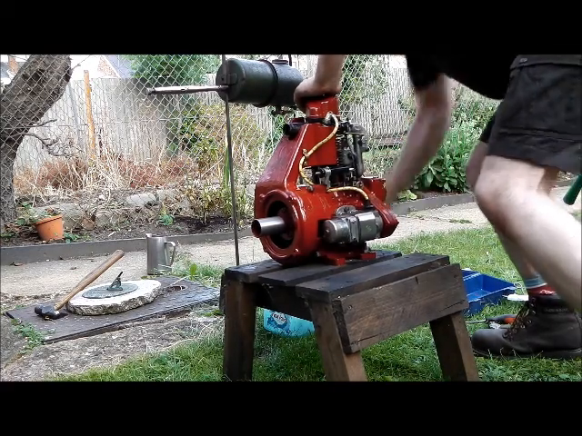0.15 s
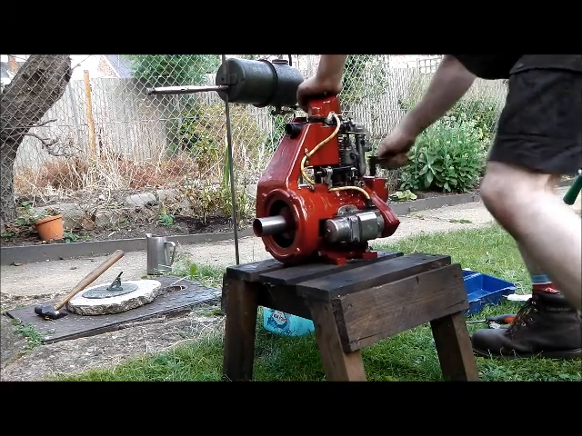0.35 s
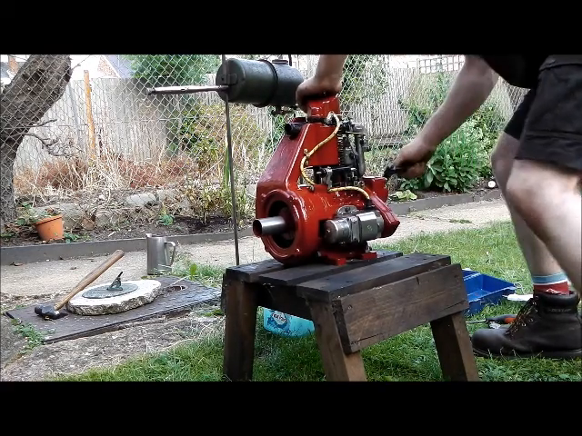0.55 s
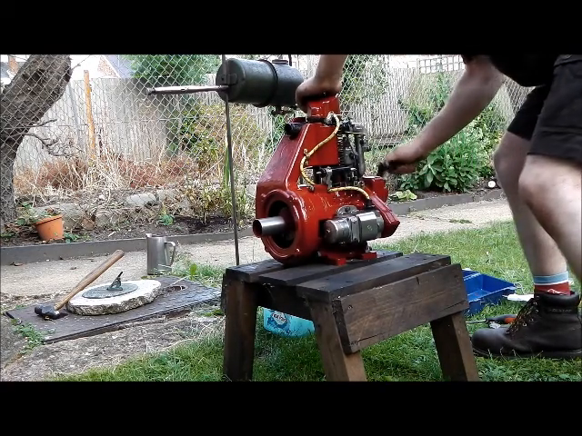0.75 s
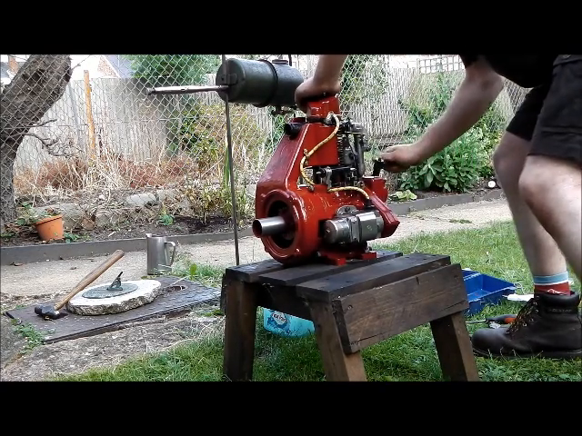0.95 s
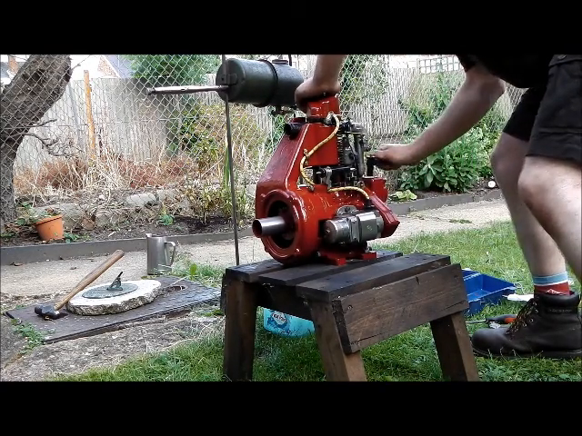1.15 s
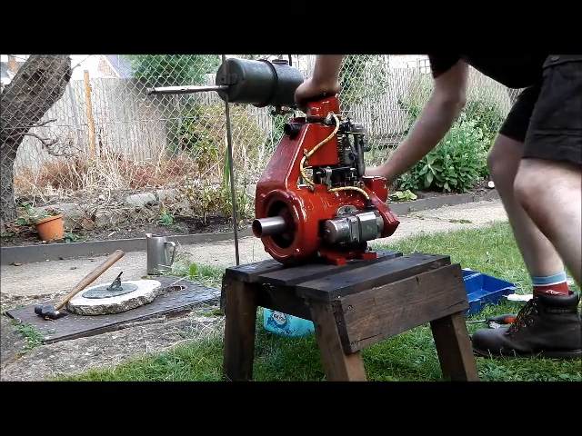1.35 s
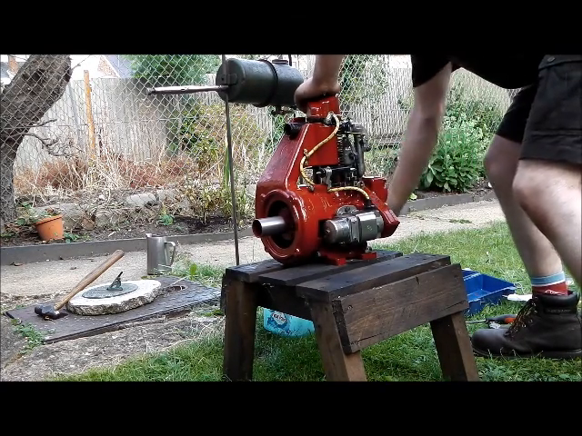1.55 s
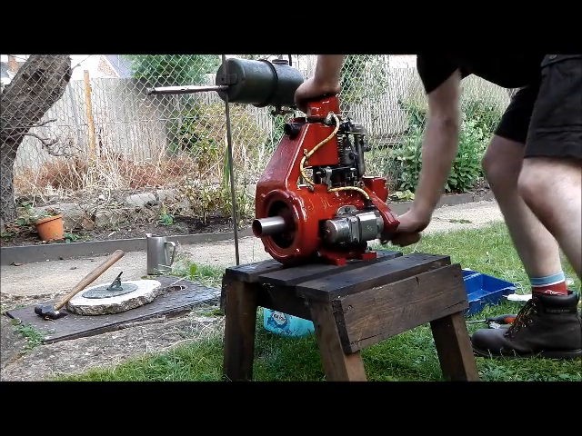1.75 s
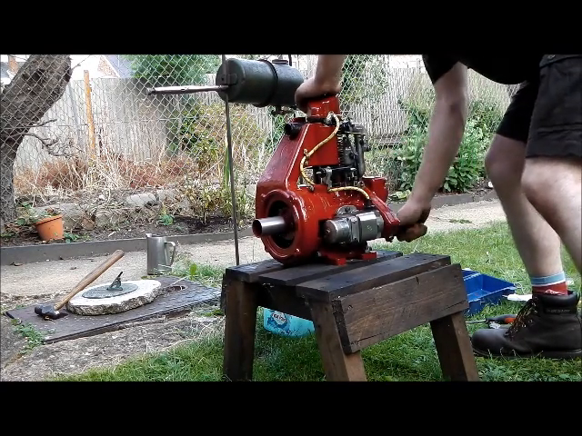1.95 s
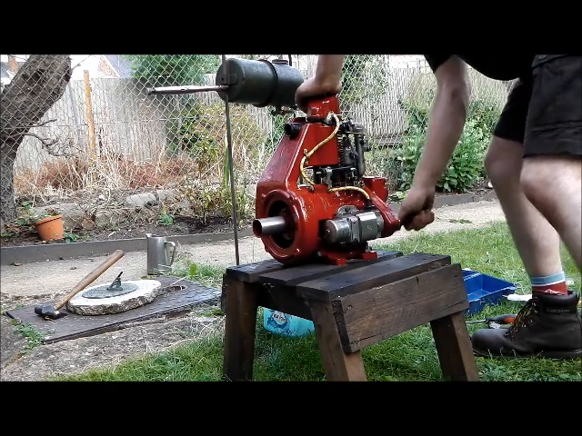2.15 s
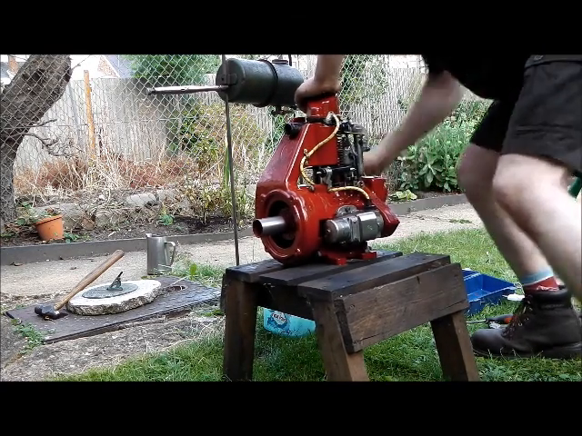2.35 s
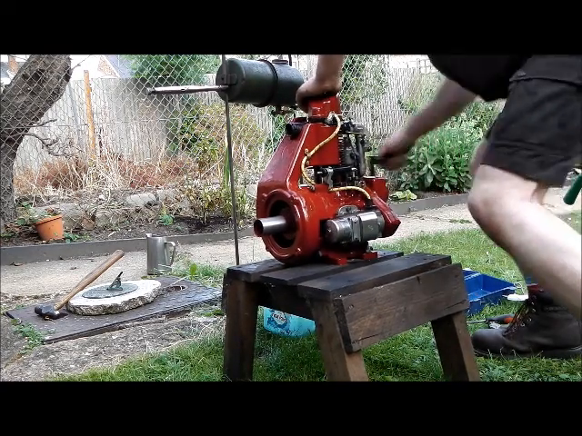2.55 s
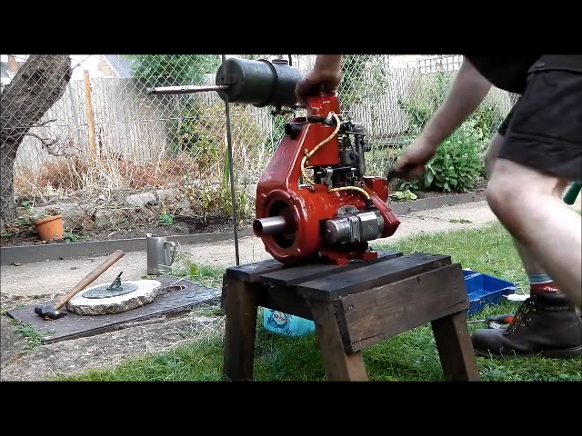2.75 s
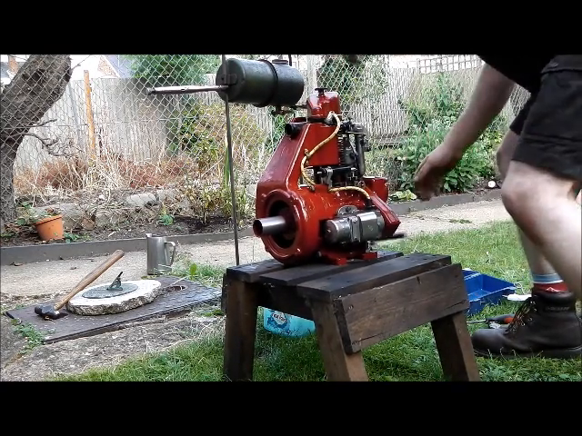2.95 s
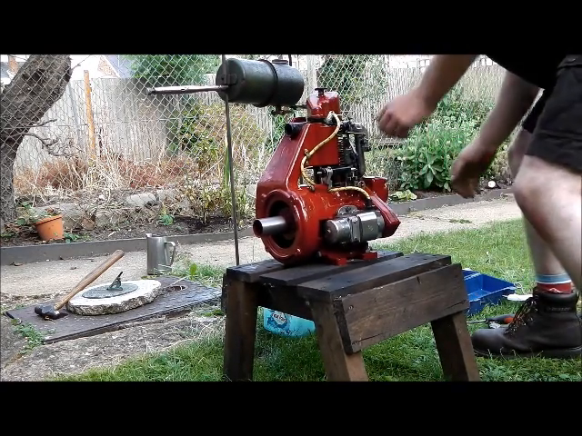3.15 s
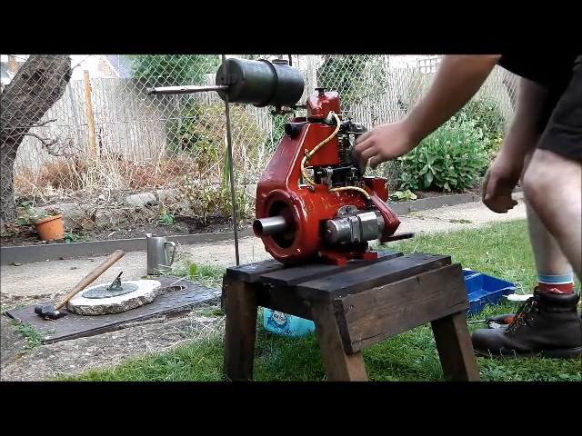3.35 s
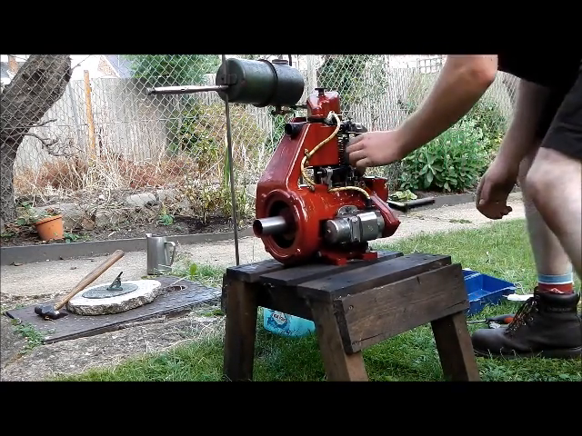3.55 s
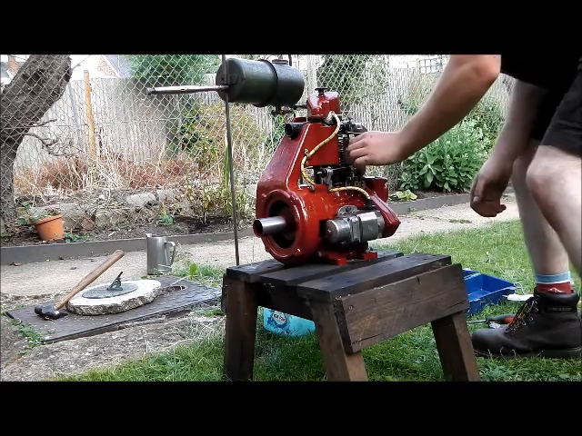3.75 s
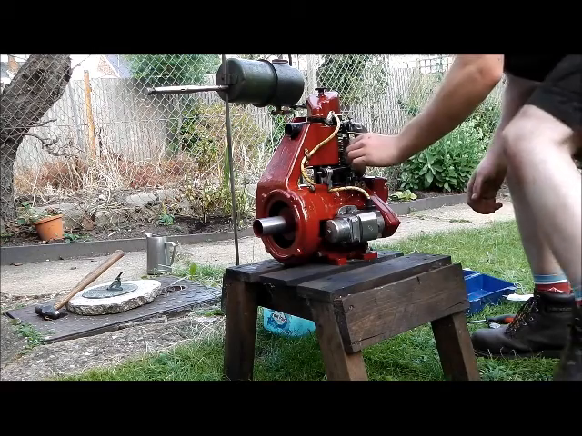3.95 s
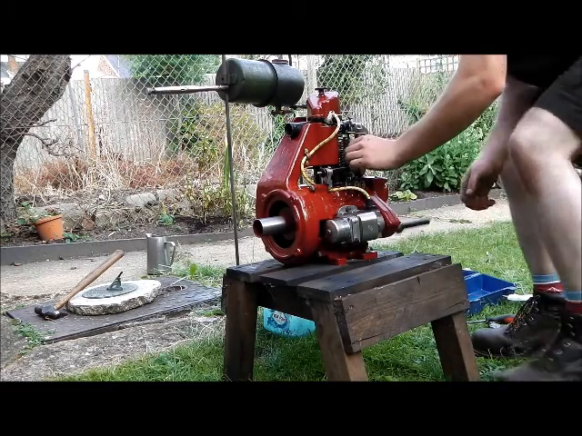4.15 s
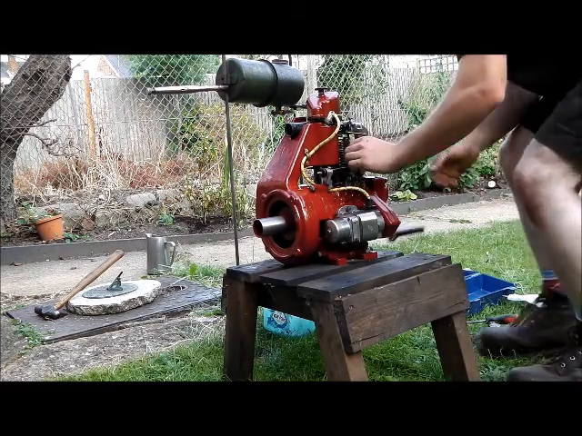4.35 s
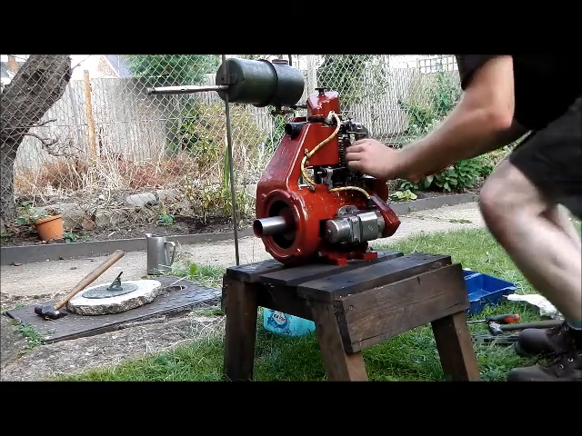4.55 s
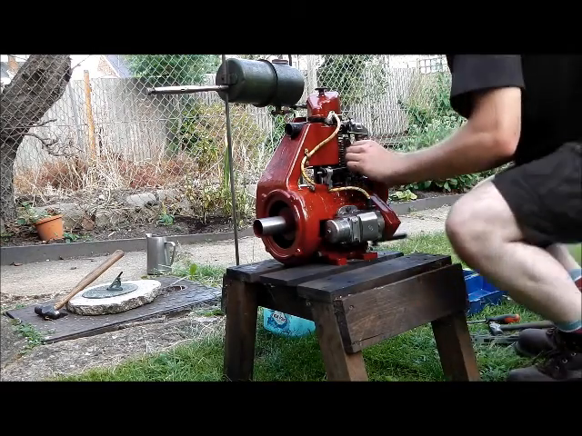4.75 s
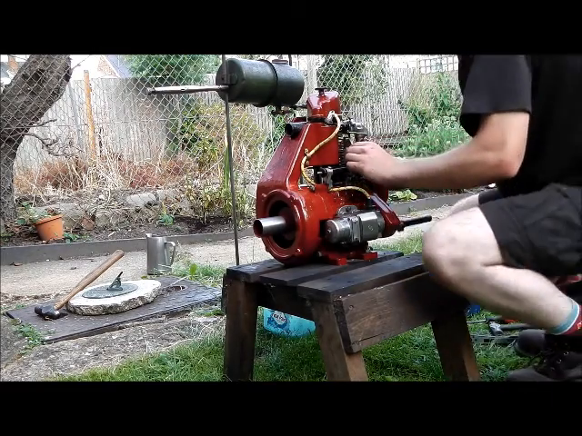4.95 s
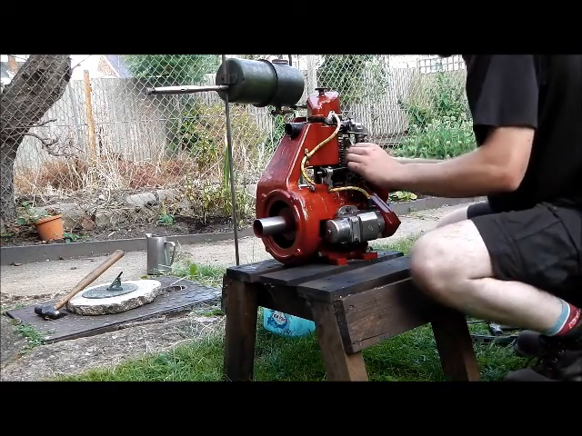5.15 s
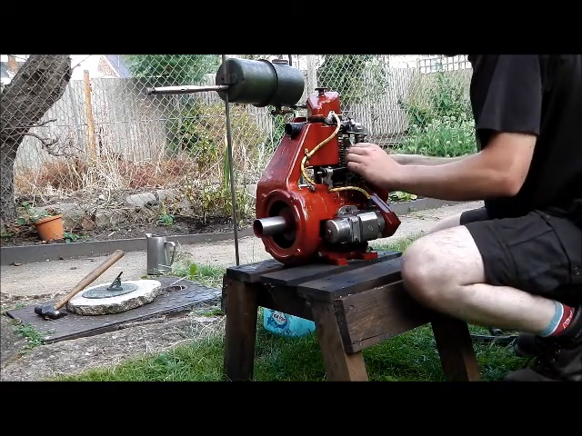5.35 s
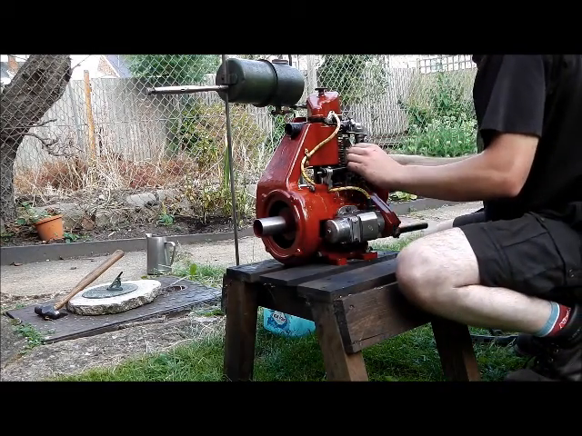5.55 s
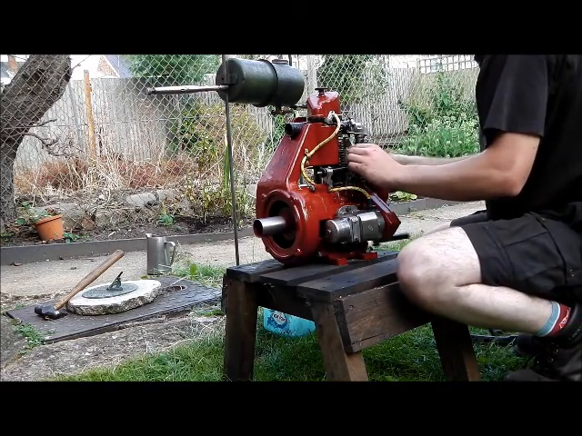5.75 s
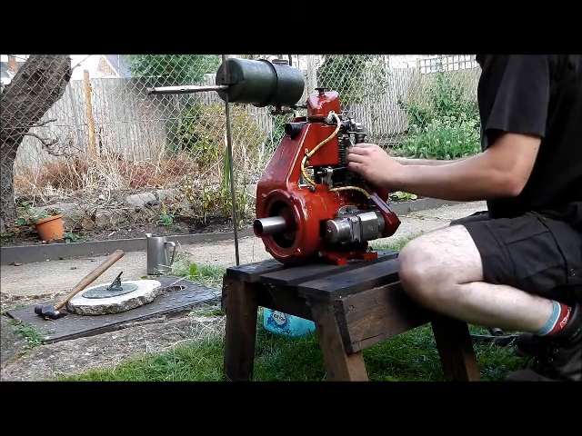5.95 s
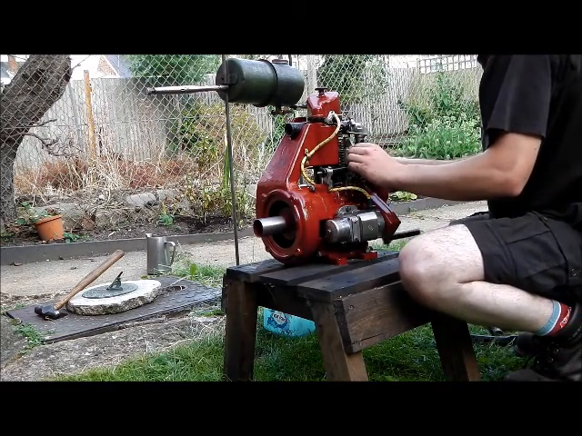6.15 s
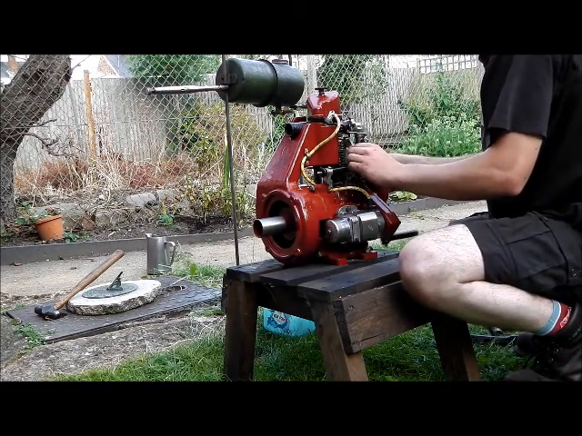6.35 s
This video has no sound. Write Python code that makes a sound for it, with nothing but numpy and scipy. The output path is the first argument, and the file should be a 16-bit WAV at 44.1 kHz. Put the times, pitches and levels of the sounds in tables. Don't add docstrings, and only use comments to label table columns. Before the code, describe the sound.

A hand-started single-cylinder engine close by in a garden. A first pull gives hard metal knocks, gear rattle, cord squeaks and a dull thump; then quiet with faint wheezes. A second pull catches: fast, loud, raspy exhaust blasts, clipped at the peaks, which slow, misfire, nearly die, then settle into steady pops over rattling gears. Fence and wall throw back short echoes.

```python
import sys
import numpy as np
from scipy import signal
from scipy.fft import rfft, irfft, next_fast_len
from scipy.io import wavfile
from scipy.ndimage import uniform_filter1d, map_coordinates

SR = 44100
rng = np.random.default_rng(int(sys.argv[2]) if len(sys.argv) > 2 else 0)


def gain_from_db(level_db):
    decades = np.asarray(level_db, float) / 20
    return 10 ** decades


def master_out(mix):
    frames = np.transpose(np.atleast_2d(mix))
    ceiling = np.clip(frames, -1, 1)
    pcm = np.round(ceiling * 32767).astype(np.int16)
    wavfile.write(sys.argv[1], SR, pcm)


N = 281799
TIME = np.arange(N) / SR

# (time [s], gear level [dB])
RUN = [
    (2.5, -22.5),
    (2.56, -22),
    (2.66, -17),
    (2.82, -15),
    (3.6, -19),
    (4.1, -24.5),
    (4.65, -24.5),
    (5.36, -36.5),
    (5.5, -28.5),
    (6.39, -31.5),
]


def pipe():
    # (time [s], thump level [dB])
    by_hand = [
        (0.12, -18.5),
        (2.36, -21),
    ]
    # (centre [s], frequency [Hz], level [dB])
    stand_knocks = [
        (.044, 120, -43),
        (.076, 125, -39),
        (0.146, 232, -29),
        (.18, 215, -34),
        (0.209, 110, -33),
        (.25, 260, -34),
        (.162, 500, -27),
        (0.294, 515, -35),
    ]
    hand_gas_db = -44
    out, t = np.zeros(N), np.arange(SR // 16) / SR

    def swing(hz, crest, centre, width, sag=0):
        since = t - crest
        return np.cos(2 * np.pi * hz * since * (1 - sag * since)) * np.exp(-((t - centre) / width) ** 2)

    slug, back = swing(104.7, 0.0045, 0.0075, 0.008), swing(137, 0.02443, 0.027, 0.0096)
    edge = swing(213.5, 0.004, 0.01, 0.0039) + gain_from_db(2.0) * swing(680, 0.0015, 0.0013, 0.00072)
    short = swing(118, 0.0056, 0.0046, 0.0055)
    rows = strokes().T.tolist() + [(s, hand_gas_db, 0, 0, db) for s, db in by_hand]
    luck_rows = rng.standard_normal((len(rows), 4))
    for (s, gas_db, _, ring_db, thump_db), luck in zip(rows, luck_rows):
        weak_db = max(-13.5 - gas_db, 0)
        speed_db = np.interp(s, *np.transpose(RUN)) + 25
        first_db = inherit((0.35, 0.73, -6), gas_db + ring_db, thump_db) + 0.22 * speed_db
        second_db = inherit((0.25, 0.4, -12.5), gas_db, thump_db) - 0.58 * weak_db
        back_db = -8 + luck[0] - 0.24 * weak_db
        thump = gain_from_db(thump_db) * ((short if weak_db > 8 else slug) + gain_from_db(back_db) * back)
        sharp = gain_from_db(0.85 * thump_db - 12.0 + 0.27 * weak_db) * edge
        first = gain_from_db(first_db) * swing(545 * (1 + 0.017 * luck[1]), 0.0121, 0.011, 0.0049)
        second_hz, sag = 420 * (1 + 0.03 * luck[2]), 4 + 2 * luck[3]
        second = gain_from_db(second_db) * swing(second_hz, 0.0195, 0.0203, 0.0075, sag)
        add(out, s, thump + sharp + first + second)
        tick = gain_from_db(thump_db - 3) * min(weak_db / 8, 1) * (gas_db > hand_gas_db)
        add(out, s - 0.00601, tick * swing(814, 0.0037, 0.0042, 0.0034, sag=25))
        add(out, s - 0.00299, gain_from_db(gas_db - 16) * swing(1070, 0.002495, 0.0019, 0.00081))
    for s, hz, db in stand_knocks:
        add(out, s - 0.02, gain_from_db(db) * swing(hz, 0.02, 0.02, 0.008))
    return out


def exhaust(gain):
    # (frequency [Hz], density [dB per Hz])
    jet_colour = [(290, -21), (500, -11), (806, -8), (1730, -3.5), (2710, -5.5), (4700, -3), (5830, -7),
                  (7140, -9), (7900, -13), (9130, -4.5), (11700, -7.5), (14900, -9.5), (15800, -21.5)]
    # (frequency [Hz], density [dB per Hz])
    echo_colour = [(350, 0.5), (600, -6.5), (789, -15), (1220, 0), (3060, -6), (3560, -8.5), (4550, -5.5),
                   (7870, -13.5), (11200, -15), (15800, -15.5)]
    # (frequency [Hz], level [dB], phase blur [rad])
    silencer = [(1445, -2.5, 0.0301), (1618, 0, 0.0312)]
    # (frequency [Hz], width [Hz], level [dB])
    nozzle = [(4625, 83, 1)]
    s, jet_db, peak_ms, ring_db, echo_db = blasts()
    last = np.maximum(np.searchsorted(s, TIME) - 1, 0)
    ahead = np.minimum(last + (TIME > s[0]), len(s) - 1)
    age = np.maximum(TIME - s[last], 0)
    u = age * 1000 / np.clip(peak_ms, 1, 12)[last]

    leak = gain_from_db(jet_db[ahead] - 25.5) * np.exp(-np.abs(s[ahead] - TIME) / 0.012)
    leak = leak + gain_from_db(jet_db[last] - 49) * np.exp(-np.abs(s[last] - TIME) / 0.0027)
    swell = gain_from_db(jet_db[last] - 1.5) * (u * np.exp(1 - u)) ** 2.57
    jet = (leak + swell) * gain_from_db(3.36 * wobble(500)) * noise(jet_colour, patchy_db=-2.5)
    jet = jet + filtered(jet, peaks(nozzle))

    tones = sum(gain_from_db(db + 1.2 * wobble(40)) * rough_tone(hz, TIME, blur) for hz, db, blur in silencer)
    ring_swell = (1 - np.exp(-2.5 * u)) * np.exp(-(u / 2.6) ** 2)
    ring = gain_from_db((jet_db + ring_db)[last] - 0.5) * ring_swell * tones * [[1], [0.8]]

    level_db = echo_db[last] - 60 * (age - 0.02) / 0.19 + 1.4 * wobble(130)
    arrival = 1 - np.exp(-(age / 0.0059) ** 2)
    echo = gain_from_db(level_db) * arrival * noise(echo_colour, patchy_db=3.5)
    return jet + ring + echo * gain


def whistles():
    # (centre [s], frequency [Hz], level [dB])
    locked = [(2.557, 4700, -5), (3.347, 4420, -10), (2.788, 4680, -24), (3.281, 4750, -0.5),
              (3.466, 4400, -9.5), (3.685, 4610, -20), (3.965, 4590, -6), (4.602, 4500, -11),
              (4.756, 4660, -16), (5.411, 4720, -15), (5.511, 4690, -13.5), (5.614, 4400, -16),
              (5.889, 4620, -16), (5.974, 4680, -13), (6.142, 4620, -16), (6.229, 4670, -6.5)]
    out, t = np.zeros((2, N)), np.arange(SR // 25) / SR
    middle, half_length_s = t[-1] / 2, 0.003
    swell = np.exp(-((t - middle) / half_length_s) ** 2)
    for s, hz, db in locked:
        add(out, s - middle, gain_from_db(db) * swell * rough_tone(hz, t, blur=0.061) * [[1], [0.8]])
    return out


def running_gear(gain):
    # (frequency [Hz], density [dB per Hz])
    hiss_colour = [(2500, -3), (3600, -3.5), (4700, -7), (6300, -9.5), (7300, -20.5), (9300, -12),
                   (11500, -18.5), (13700, -15.5), (15800, -17.5)]
    stand_colour = [(60, -3), (110, -4.5), (200, -1), (350, -9), (600, -1.5), (1200, -60)]  # Hz, dB per Hz
    gears_db, hiss_db = effort()
    s = strokes()[0]
    by_hand = TIME < s[0]
    turn = np.interp(TIME, s, np.arange(len(s))) % 1
    grain = np.clip((gears_db + 56.5) / 16, 0.3, 1) * np.where(by_hand, 1.43, 1)
    rattle = (1.5 * wobble(330) + 1.34 * wobble(45)) * grain - 5.1 * turn
    gears = gain_from_db(gears_db + rattle) * noise(iron, patchy_db=2.5)
    hiss = gain_from_db(hiss_db + 0.5 * rattle) * noise(hiss_colour, patchy_db=3.0)
    stand_db = gears_db - 21 + 4 * by_hand + 2.6 * wobble(30) - 3 * turn
    stand = gain_from_db(stand_db) * noise(stand_colour, patchy_db=2.5)
    return (gears + hiss + stand) * gain


def starter():
    # (time [s], peak level [dB], loudest mode [Hz], t60 [s], brightness [dB])
    first_pull = [(0.058, -17, 1186, 0.057, -13), (0.102, -19.5, 960, 0.054, -12),
                  (0.116, -16, 2170, 0.028, 13.5), (0.145, -1.5, 3740, 0.02, 0.5),
                  (0.184, -10.5, 3240, 0.061, -13), (0.203, -14, 3300, 0.04, -14),
                  (0.216, -13, 3180, 0.044, -6), (0.242, -6.5, 2210, 0.046, -8),
                  (0.286, -5.5, 2390, 0.044, -5.5), (0.29, -20, 3030, 0.021, -15),
                  (0.321, 3, 3200, 0.043, 0), (0.342, -10, 2110, 0.044, -2),
                  (0.372, -9.5, 2180, 0.055, -6.5), (0.409, -17, 1104, 0.054, 2),
                  (0.45, -13, 2370, 0.051, -21), (0.476, -16.5, 2560, 0.13, -6.5),
                  (0.538, -20, 1200, 0.05, -22), (0.561, -21, 2280, 0.099, -14),
                  (0.715, -2, 2370, 0.034, -25), (0.755, -23.5, 1130, 0.11, -29),
                  (0.775, -22, 1504, 0.04, -20), (0.858, -17, 1920, 0.025, -8), (0.884, -15, 2530, 0.14, 7),
                  (0.892, 3.5, 2677, 0.036, -2)]
    later_knocks = [(1.042, -35, 1690, 0.045, -10), (1.205, -35, 1200, 0.041, -15),
                    (1.736, -21.5, 1290, 0.031, -27), (1.741, -29, 800, 0.022, -29),
                    (1.828, -21, 1010, 0.041, -27), (1.838, -15, 2140, 0.032, -29),
                    (1.962, -29, 2110, 0.031, -26), (2.247, -42, 2160, 0.033, 2),
                    (2.302, -12.5, 2400, 0.023, 2), (2.316, -16, 2360, 0.027, -6),
                    (2.345, -15, 880, 0.027, -11), (2.358, -9.5, 4500, 0.027, 1),
                    (2.394, -5.5, 2390, 0.032, 1), (2.429, -15, 1200, 0.037, 0),
                    (2.455, -14, 2690, 0.054, 0), (2.487, -9.5, 2590, 0.046, -9),
                    (2.529, -5, 2050, 0.046, -4), (2.584, -2.5, 2300, .04, -1),
                    (4.236, -13, 720, 0.051, -18)]
    valve_gear = [(3.498, -5.5, 4300, .03, 1), (3.616, -16.5, 4230, 0.023, 13), (3.76, -15, 3200, 0.038, 8),
                  (4.165, -17, 2300, .03, 7), (4.177, -18.5, 3300, .03, 11), (4.245, -5.5, 2400, .03, 0),
                  (4.331, -22, 2330, .03, -15), (4.522, -10, 2400, .03, -3), (4.542, -11, 4370, 0.028, 2.5),
                  (4.831, -18, 1130, 0.038, -1), (4.857, -13, 3130, .025, 0), (4.917, -20, 1090, 0.018, -6),
                  (4.936, -18, 2400, 0.032, 2), (5.014, -20, 1040, .025, -10),
                  (5.03, -16.5, 2400, 0.035, -2), (5.109, -27, 2400, 0.022, -10),
                  (5.14, -13, 2260, 0.042, -6), (5.191, -18.5, 2400, 0.042, -5),
                  (5.235, -19, 2500, .03, -10), (5.272, -15, 2210, 0.023, -13),
                  (5.283, -20, 2400, 0.027, 0), (5.298, -27, 2400, 0.027, -18), (5.388, -15, 2310, .03, -9),
                  (5.698, -15.5, 2400, .03, -3), (5.716, -20, 3180, .03, 6)]
    # (frequency [Hz], density [dB per Hz])
    crack_colour = [(1500, -20), (2600, -5.5), (5000, 2), (6500, -11), (8000, -18), (10600, -15.5),
                    (13000, -20), (15800, -30)]
    # (frequency [Hz], level [dB], t60 [share of the knock's])
    cowl_hum = [(536, -35, 3.5), (776, -26, 2.5), (875, -31, 2.5), (1150, -26, 2), (1335, -28, 2)]
    # (centre [s], half length [s], frequency [Hz], level [dB], phase blur [rad])
    squeaks = [
        (.338, .014, 2100, -17, .05),
        (.214, .03, 3200, -24, .09),
        (.418, .008, 1170, -22, .05),
        (.13, 0.014, 4120, -22, .06),
        (.122, .006, 6150, -30, .1),
        (.67, 0.024, 2690, -23, 0.13),
        (.67, 0.022, 1750, -26, 0.12),
    ]
    out, t = np.zeros((2, N)), np.arange(SR // 5) / SR
    body = noise(iron, patchy_db=0)
    dull = filtered(body, lambda hz: 1 / (1 + (hz / 3300) ** 6))
    bright = noise(crack_colour, patchy_db=3.0)
    for s, db, hz, t60, bright_db in first_pull + later_knocks + valve_gear:
        def fall(share):
            return gain_from_db(-60 * t / (share * t60)) * (1 - np.exp(-t / 0.001))

        at = slice(round(s * SR), round(s * SR) + len(t))
        burst = dull[:, at] + gain_from_db(min(bright_db + 2, 0)) * (body[:, at] - dull[:, at])
        crack = (fall(0.62) + gain_from_db(-16.5) * fall(5.3)) * burst
        crack = crack + gain_from_db(bright_db) * fall(0.91) * bright[:, at]
        mode_db = -4 + 0.02 * db + 6
        mode = gain_from_db(mode_db) * fall(1.3) * rough_tone(hz, t, blur=0.11)
        hum = sum(gain_from_db(hum_db + rng.normal(0, 2.6)) * fall(lasts) * rough_tone(hum_hz, t, blur=0.028)
                  for hum_hz, hum_db, lasts in cowl_hum)
        add(out, s, gain_from_db(db - 7.5) * (crack + (mode + hum) * [[1], [0.7]]))
    for centre, half, hz, db, blur in squeaks:
        swell = np.exp(-((t - 0.1) / half) ** 4)
        add(out, centre - 0.1, gain_from_db(db) * swell * rough_tone(hz, t, blur) * [[1], [0.7]])
    return out


def wheeze():
    # (frequency [Hz], width [Hz], level [dB])
    inlet = [(2400, 1600, 1.5), (3060, 700, 4), (6260, 600, -9)]
    outlet = [(3430, 310, 0), (4070, 500, -1), (5080, 460, -1.5), (6160, 250, -3)]
    seat = [(8900, 2100, -0.5), (13100, 800, -1), (14100, 1100, -0.5)]
    # (centre [s], half length [s], level [dB], seat hiss level [dB])
    sucks = [
        (1.397, 0.091, -41.5, -51),
        (1.624, 0.09, -44.5, -59),
        (0.596, 0.03, -39, -39),
    ]
    blows = [
        (1.623, 0.075, -39, -57),
        (1.53, 0.049, -43, -73),
        (0.839, 0.048, -37.5, -45),
    ]
    t = TIME[::40]

    def swell(rows, column):
        breaths = sum(gain_from_db(row[column] - 9.0 * np.minimum(np.abs((t - row[0]) / row[1]) ** 3, 20))
                      for row in rows)
        return np.interp(TIME, t, breaths)

    def air(modes, order):
        return unit(filtered(rng.standard_normal((2, N)), lambda hz: np.abs(peaks(modes)(hz)) ** order))

    drawn = swell(sucks, 2) * air(inlet, order=1.4)
    blown = swell(blows, 2) * air(outlet, order=1.4)
    return drawn + blown + swell(sucks + blows, 3) * air(seat, order=1.7)


def garden():
    # (frequency [Hz], density [dB per Hz])
    leaf_colour = [(250, -15.5), (400, -4.5), (900, -11), (3000, -17.5), (6000, -26), (9300, -28),
                   (10500, -37), (15900, -31)]
    # (frequency [Hz], density [dB per Hz])
    rumble_colour = [(30, -23), (60, -2.5), (100, 2.5), (150, -5.5), (210, -10), (260, -36), (600, -60)]
    # (centre [s], half length [s], depth [dB])
    lulls = [
        (1.13, .025, 16),
        (1.345, 0.027, 14),
        (1.742, 0.068, 6),
        (2.077, 0.034, 19),
        (2.232, .015, 19),
        (5.2, .25, 9),
    ]
    lull_db = sum(db * np.exp(-((TIME - s) / half) ** 2) for s, half, db in lulls)
    leaves = gain_from_db(-51) * noise(leaf_colour, patchy_db=2.0)
    return leaves + gain_from_db(-48.5 + 0.5 - lull_db) * noise(rumble_colour, patchy_db=1.5)


def duck():
    # (time [s], extra depth [dB])
    clamps = [(0, 0), (0.308, 3.5), (2.514, 15), (2.713, 5), (2.899, 4.5), (3.017, 6), (3.078, 3.5),
              (3.14, 3.5), (3.27, 3), (3.315, 1.5), (3.655, 1.5), (3.813, 10), (4.012, 5), (4.084, 7),
              (4.38, 0), (4.445, 10.5), (4.582, 5), (4.662, 10), (4.733, 0), (5.5, 7), (5.592, 6),
              (5.868, 2.5), (6.296, 3)]
    s, db = blasts()[:2]
    ahead = np.minimum(np.searchsorted(s, TIME), len(s) - 1)
    wait = s[ahead] - TIME
    at, extra_db = np.transpose(clamps)
    near = np.searchsorted((at[1:] + at[:-1]) / 2, TIME)
    clamp_db = extra_db[near] * np.exp(-((TIME - at[near]) / 0.014) ** 2)
    depth_db = 11 + 0.4641 * db[ahead]
    return gain_from_db(-depth_db * (wait >= 0) * np.exp(-(wait / 0.011) ** 2) - clamp_db)


def strokes():
    # (valve opens [s], blast [dB], rise [ms], silencer ring [dB re blast], thump [dB])
    racing = [(2.5521, 2.5, 3.1, -20, -15), (2.6463, 3.5, 4.2, -10, -11.5), (2.722, -2, 5.5, -7, -14.5),
              (2.7875, 5, 2.9, -7, -11), (2.8518, -1, 4.7, -3, -11), (2.913, 0, 2.6, 2, -14),
              (2.9732, -3, 6.1, -10, -10), (3.035, 2.5, 1.95, -3, -12.5), (3.0965, -6, 3, -21, -18),
              (3.1579, -2, 2.5, -4, -13), (3.217, -4.5, 6.2, -7.5, -15.5), (3.2785, -3.5, 5.2, -3.5, -12),
              (3.3414, -3.5, 7.9, -21, -13.5), (3.4, 0, 2.9, -4.5, -12.5), (3.4649, -7.5, 4.1, -3.5, -18.5),
              (3.531, -24.5, 4.6, -19, -14.5), (3.601, -20.5, 2.3, -20, -23)]
    hunting = [(3.6797, -5, 5.4, -24, -16.5), (3.7445, -21, 7, -22, -20), (3.822, -8, 3.3, -12, -14.5),
               (3.8935, -7.5, 5.2, -0.5, -16), (3.961, -1.5, 4.7, -5.5, -14), (4.03, -6.5, 5.1, -22, -20),
               (4.099, -10.5, 1.5, -10, -20.5), (4.17, -26.5, 15, -22, -22.5), (4.238, -18, 4.5, -24, -28),
               (4.316, -28, 1.5, -17, -22), (4.3889, -8.5, 9.9, -18, -19), (4.4606, -7.5, 2.3, -9, -21.5),
               (4.5306, -23.5, 3.3, -18, -20.5), (4.602, -2.5, 4.8, -5.5, -17),
               (4.676, -11.5, 1.95, 1, -27), (4.753, -8.5, 3.2, 0, -21), (4.8373, -29, 7.7, -19, -23.5),
               (4.917, -29, 2.2, -12, -27.5), (5.0198, -34, 3.1, -16, -27), (5.126, -38, 2, -9, -29.5),
               (5.26, -38, 3, -28, -29.5)]
    settled = [(5.4096, -9.5, 7.3, -16, -23.5), (5.509, -13.5, 3.6, -15, -20), (5.6117, -9, 2.9, -4, -25),
               (5.703, -34.5, 9.4, -12, -27), (5.795, -4, 5.6, -11, -16), (5.887, -6.5, 2.9, -5.5, -24.5),
               (5.97, -7, 3.8, -7, -20), (6.055, -7, 3.6, -9, -20.5), (6.1393, -7.5, 3.8, -5, -20),
               (6.2267, -6.5, 2.9, -3, -22), (6.318, -11.5, 4.1, -9.5, -28.5)]
    return np.transpose(racing + hunting + settled)


def blasts():
    # (time [s], level [dB], silencer ring [dB re spit])
    puffs = [(2.631, -8, -8), (2.809, -12, 0), (3.05, -11.5, 2), (3.174, -10.5, -1), (3.21, -9, -8),
             (3.348, -8, -12), (3.411, -9.5, 4.5), (3.476, -12.5, -8), (3.689, -5.5, -9), (3.838, -9, -3.5),
             (3.902, -9.5, -1), (4.021, -24, -15), (4.284, -19, -18), (4.391, -6, -16), (4.594, -24, -8),
             (4.746, -22, -14), (5.416, -9, -11), (5.874, -26, -7), (5.961, -21, 0), (6.048, -19, -12),
             (6.133, -20, -8), (6.217, -20.5, -6)]
    s, db, rise_ms, ring_db, thump_db = strokes()
    wall_db = np.minimum(inherit((0.43, 0.6, -7.5), db, thump_db), db + 0.5)
    fired = [s + (2 - rise_ms) / 1000, db, rise_ms, ring_db, wall_db]
    s, db, ring_db = np.transpose(puffs)
    rows = np.hstack([fired, [s, db, 3.05 + 0 * s, ring_db, db - 12.0]])
    return rows[:, np.argsort(rows[0])]


def effort():
    # (centre [s], half length [s], gears [dB], air [dB])
    tugs = [(0.112, 0.045, -29, -27), (0.222, 0.049, -24, -26), (0.339, 0.0082, -17, -40),
            (0.388, 0.079, -25.5, -27.5), (0.597, 0.033, -33, -28.5), (0.671, 0.041, -33, -35),
            (0.756, 0.054, -44, -47), (0.84, 0.031, -48, -44), (0.924, 0.08, -39.5, -41.5),
            (1.417, 0.083, -43, -54), (1.64, 0.13, -51, -54), (1.838, 0.047, -42.5, -44),
            (2.233, 0.098, -59, -51.5), (2.351, 0.039, -45, -27), (2.485, 0.092, -23, -28.5)]
    edge_db, gears_linger = 13.5, 1.66
    t = TIME[::50]
    centre, half, gears_db, air_db = np.transpose(tugs)[..., None]
    away = ((t - centre) / half) ** 2
    run_db = np.interp(t, *np.transpose(RUN), left=-120)
    load_db = np.interp(t, *strokes()[[0, 4]]) + 20
    gears = gain_from_db(gears_db - edge_db * away / gears_linger ** 2).sum(0) + gain_from_db(run_db) + gain_from_db(-63.0)
    air = gain_from_db(air_db - edge_db * away).sum(0) + gain_from_db(run_db - 6 + 0.3 * load_db) + gain_from_db(-75.0)
    return [np.interp(TIME, t, 20 * np.log10(level)) for level in (gears, air)]


def inherit(law, gas_db, thump_db):
    return law[0] * gas_db + law[1] * thump_db + law[2]


def iron(hz):
    # (frequency [Hz], density [dB per Hz])
    teeth = [(400, -55), (750, 3), (1200, 0), (2400, 1), (3400, 8), (4500, -3), (7000, -3), (15900, -66)]
    # (frequency [Hz], width [Hz], level [dB])
    casing = [(1119.5, 21, 11.5), (1200, 54, 5), (1560, 250, 4.5), (1960, 105, 4.5), (2114, 33, 9),
              (2370, 115, 8), (3084, 176, -0.5), (4500, 100, 4)]
    return gain_from_db(along(teeth, hz)) * (1 + gain_from_db(11.5) * np.abs(peaks(casing)(hz)))


def unit(x):
    return x / np.sqrt(np.mean(x ** 2) + 1e-20)


def along(points, hz):
    f, v = np.transpose(points)
    return np.interp(np.log(hz + 1), np.log(f + 1), v)


def filtered(x, response):
    m = next_fast_len(N + SR // 4)
    return irfft(rfft(x, m) * response(np.fft.rfftfreq(m, 1 / SR)), m)[..., :N]


def peaks(modes):
    def response(f):
        return sum((-1) ** k * gain_from_db(db) * 1j * f * w / (c * c - f * f + 1j * f * w)
                   for k, (c, w, db) in enumerate(modes))
    return response


def wobble(rate):
    coarse = TIME[::8]
    knots = rng.standard_normal(int(N * rate / SR) + 4)
    return np.interp(TIME, coarse, map_coordinates(knots, [coarse * rate]))


def noise(colour, patchy_db):
    z = signal.stft(rng.standard_normal((2, N)), nperseg=256)[2]
    field = uniform_filter1d(rng.standard_normal(z.shape[1:]), 3, 0)
    field = unit(uniform_filter1d(field, 5, 1))
    pair = signal.istft(z * gain_from_db(patchy_db * field), nperseg=256)[1][:, :N]

    def shape(hz):
        return gain_from_db(along(colour, hz)) * np.minimum(hz / colour[0][0], 1) ** 2

    return unit(filtered(pair, colour if callable(colour) else shape))


def rough_tone(hz, t, blur):
    return np.sin(2 * np.pi * hz * t + np.cumsum(rng.normal(0, blur, len(t))))


def add(track, s, sound):
    part = track[..., round(s * SR):][..., :sound.shape[-1]]
    part += sound[..., :part.shape[-1]]


def scene():
    # (frequency [Hz], width [Hz], level [dB])
    cowl = [(530, 34, 6.5), (778, 24, 9), (874, 30, 7.5)]
    # (frequency [Hz], side minus mid [dB])
    wide = [(60, -15), (110, -6.5), (200, -12.5), (380, -9.5), (700, -13), (1290, -12), (2380, -9.5),
            (4400, -6), (8120, 0.5), (15000, -4)]
    # (frequency [Hz], left minus right [dB])
    lean = [(60, -2), (110, -0.3), (200, -2), (380, -1), (700, -1), (1290, -1.5), (2380, -2), (4400, -0.5),
            (8120, 0.5), (15000, -1)]
    gain = duck()
    metal = running_gear(gain) + starter()
    metal = metal + filtered(metal, peaks(cowl))
    bass = filtered(pipe(), lambda hz: [[1], [-0.03 + 0.34j]] + 0 * hz)
    mid, side = exhaust(gain) + whistles() + metal + wheeze() + bass + garden() * gain
    mid = filtered(mid, lambda hz: 1 - 0.84 * np.exp(-((hz - 7900) / 230) ** 2))
    side = filtered(side, lambda hz: gain_from_db(along(wide, hz)))
    ports = np.array([mid + side, mid - side])
    return filtered(ports, lambda hz: gain_from_db(along(lean, hz) * np.array([[0.5], [-0.5]])))


def band_limit(x):
    return signal.sosfilt(signal.butter(12, 15740, fs=SR, output="sos"), x)


def record(dry):
    clipped = dry / (1 + np.abs(dry) ** 8) ** (1 / 8)
    return band_limit(clipped)


dry = scene()
out = record(dry)
master_out(out)
```